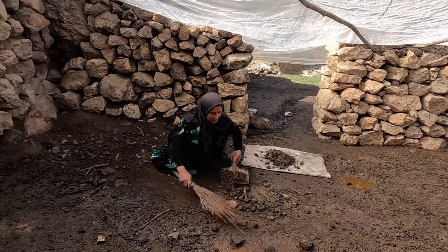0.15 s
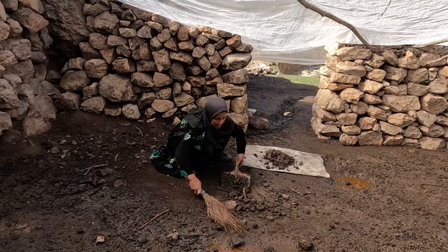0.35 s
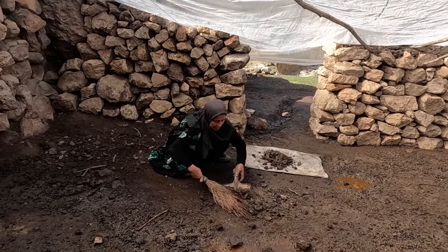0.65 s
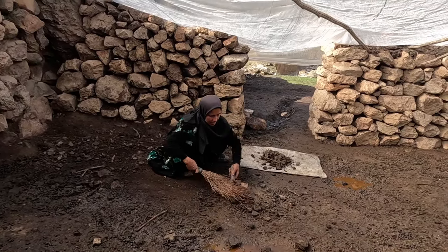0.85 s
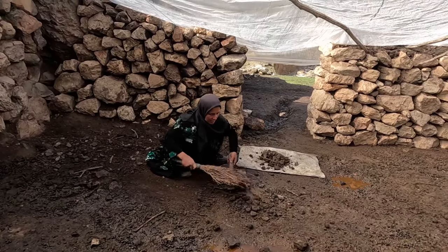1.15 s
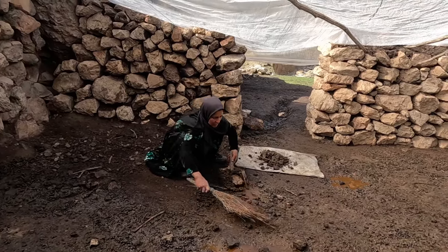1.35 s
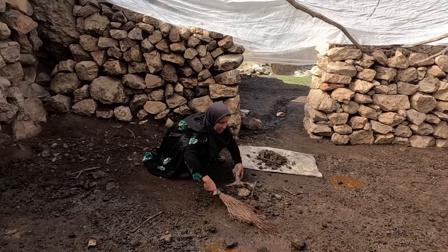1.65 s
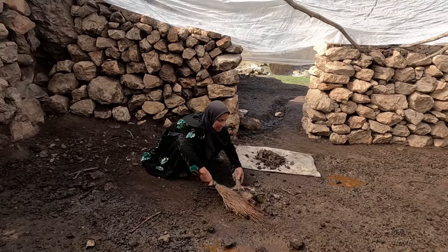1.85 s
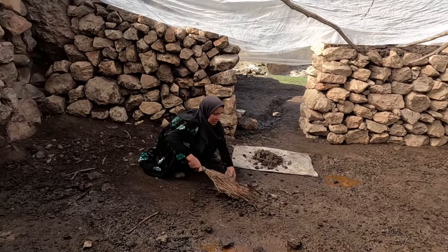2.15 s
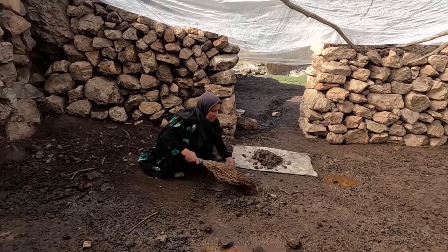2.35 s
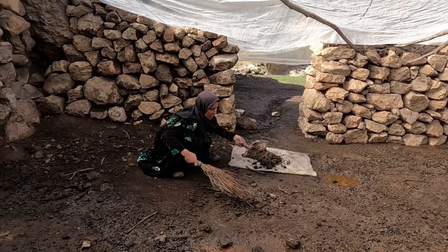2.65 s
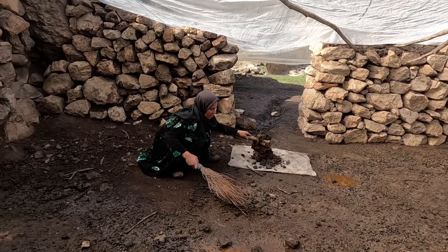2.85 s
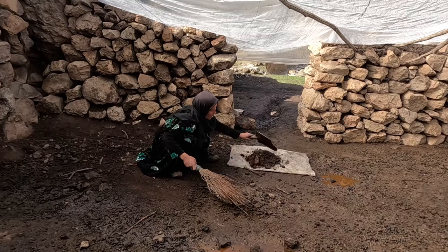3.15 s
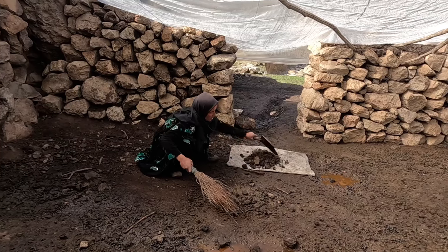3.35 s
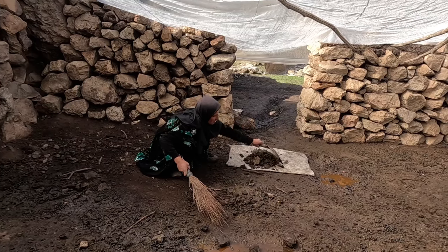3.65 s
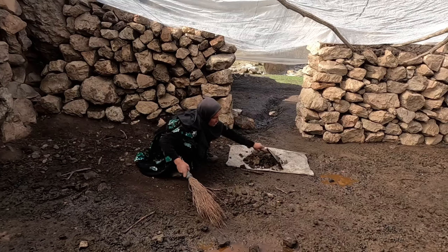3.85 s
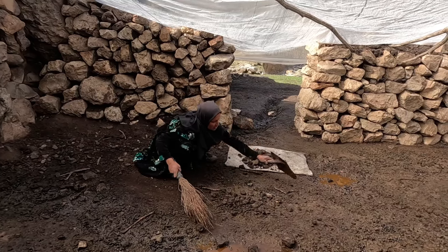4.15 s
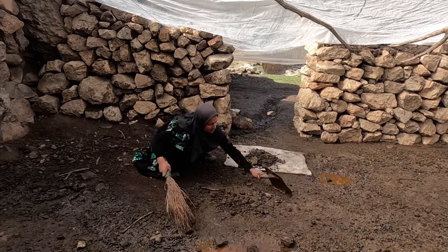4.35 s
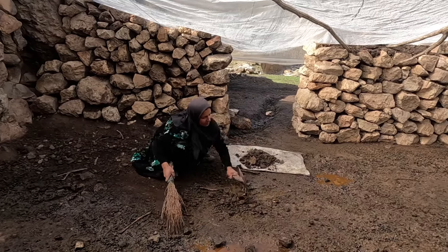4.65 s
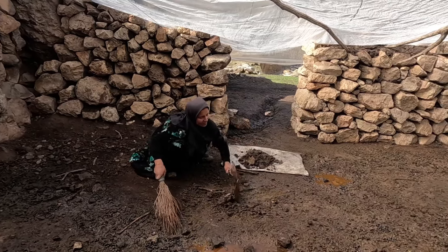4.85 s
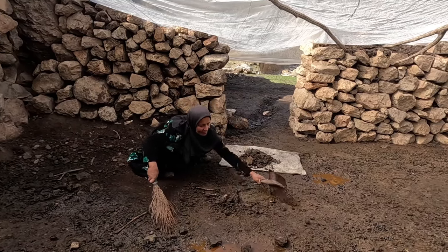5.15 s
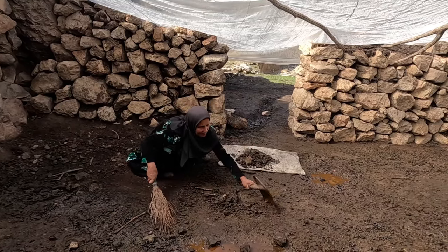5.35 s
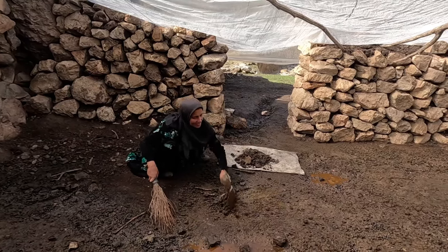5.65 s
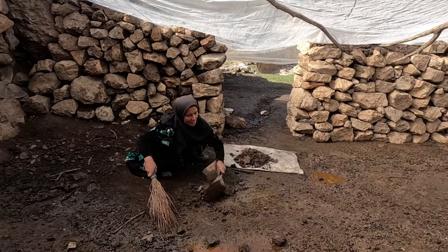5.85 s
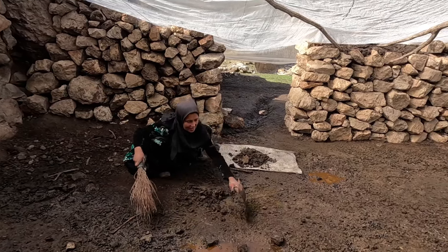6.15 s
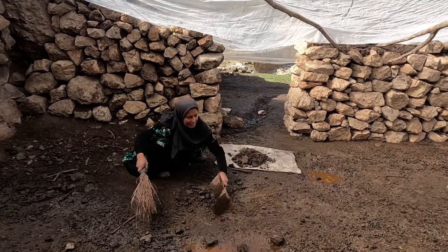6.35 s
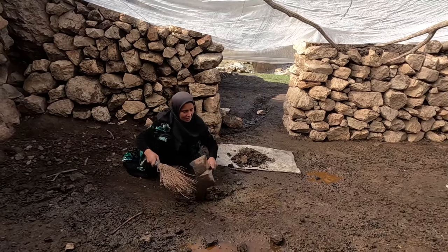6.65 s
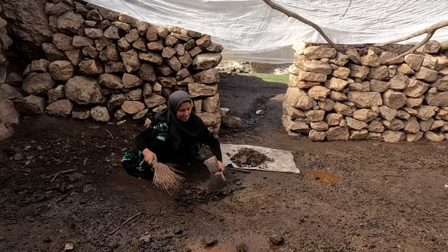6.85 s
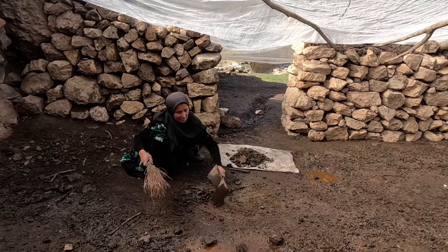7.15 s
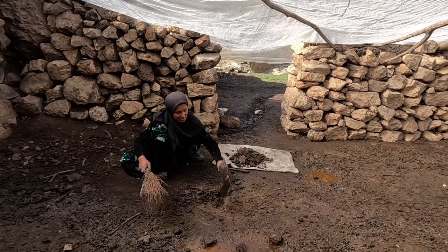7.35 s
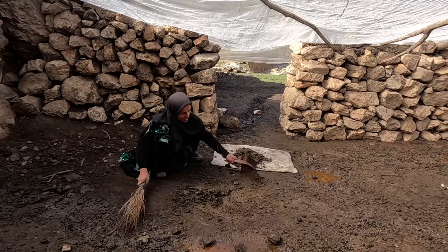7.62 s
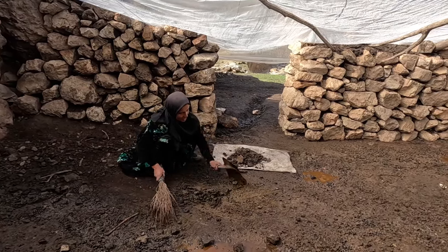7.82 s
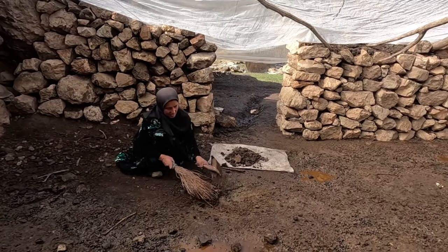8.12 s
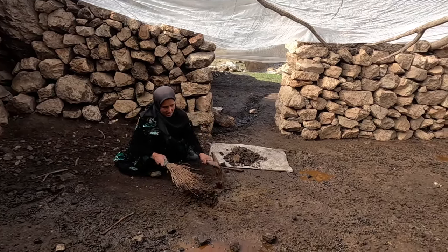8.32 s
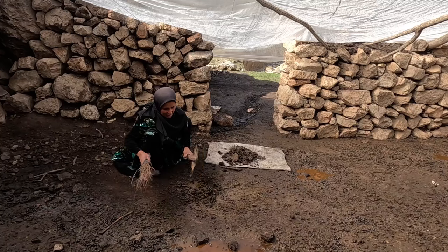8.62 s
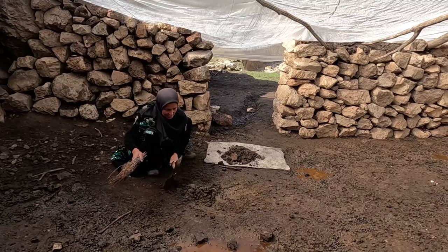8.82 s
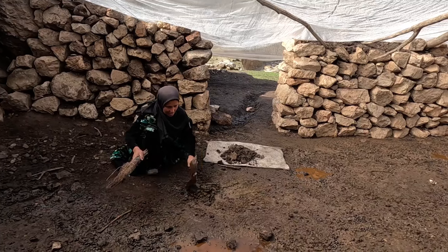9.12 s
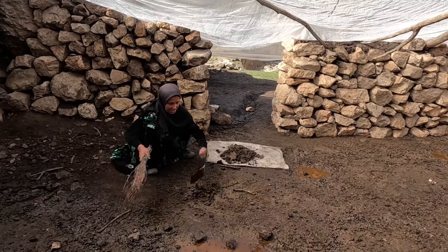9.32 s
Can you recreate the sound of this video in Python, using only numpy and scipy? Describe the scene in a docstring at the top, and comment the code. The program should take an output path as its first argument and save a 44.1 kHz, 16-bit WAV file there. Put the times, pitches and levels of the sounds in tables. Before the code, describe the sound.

A quiet outdoor hush and uneven low wind rumble run throughout. From 0 to 2 s a straw broom gives short, dry, hissing strokes about every half second, with gritty scrapes and a thin scoop knocking brightly, a tight loud cluster at 0.6-0.9 s and more at 1.6-1.7 s. Distant birds trill from 1.2 s, joined by raspy rising chirps at 2-3 s while sweeping pauses. At 3-4 s dirt is tipped and the scoop tapped out: crunchy bursts and dull low thumps, strongest at 3.7 and 3.9 s. Softer thumps, scuffs and swishes follow from 4.4 to 5.7 s. Hard ringing clacks with a strong swish come at 6.4-6.6 s, thumpy scuffs at 7.0 and 7.3 s, faint bird notes around 7.5 s, and a brisk double swish with rattling at 7.9 s. Then only faint scuffs and chirps until a solid scoop knock and scrape at 9.2 s. Stone walls add a very brief scattered tail.

```python
"""A straw broom sweeps earth with a scoop inside a stone pen; noise grains make straw hiss and gritty scrapes.
From the start the yard hushes and wind rumbles (filtered noise), and small birds soon call (gliding tones).
Then come knocks that ring the scoop and scuffs of loose earth: each is a crack and a fading rattle of noise.
From about three seconds on, soft thumps on sack and ground join in, made of fading low tones.
Broom, knocks and scuffs get a short scattered tail from the stone walls."""
import sys
import numpy as np
from scipy import signal
from scipy.fft import rfft, irfft
from scipy.io import wavfile
from scipy.ndimage import uniform_filter1d

SR = 44100
rng = np.random.default_rng(int(sys.argv[2]) if len(sys.argv) > 2 else 0)


def wav_record(signal):
    """Record a signal, one row per channel, as 16-bit PCM in the file named by sys.argv[1]."""
    frames = np.transpose(np.atleast_2d(signal))
    bounded = np.clip(frames, -1, 1)
    # unit amplitude maps onto the largest positive 16-bit level
    quanta = np.round(bounded * 32767).astype(np.int16)
    wavfile.write(sys.argv[1], SR, quanta)


N = 418068

# resonances of the thin scoop, before each user scales them: f/Hz, width/Hz, boost/dB
SCOOP = [(937, 17, 2), (1086, 46, 5), (1282, 200, 6.5), (1532, 110, 10.5), (1906, 120, 7.5), (2297, 280, 4),
         (2600, 180, 5), (3255, 100, 7.5), (4110, 160, 6.5), (4440, 61, 13.5), (5290, 320, 7.5),
         (7320, 3400, 8.5)]


def undb(db):
    """Turn decibels into a gain."""
    return 10 ** (np.asarray(db) / 20)


def unit(x):
    """Scale a sound to an rms (average strength) of 1."""
    return x / np.sqrt(np.mean(x ** 2))


def shape(hz, points):
    """Gain curve through points (f/Hz, level/dB), joined along a log-frequency axis."""
    f, db = np.transpose(points)
    return undb(np.interp(np.log(hz + 1), np.log(f), db))


def scoop_ring(hz, share=np.ones(len(SCOOP))):
    """Resonance peaks of the thin scoop over a flat response; share = how well each one is excited."""
    gain = 1
    for (f, width, boost_db), part in zip(SCOOP, share):
        gain = gain + part * (undb(boost_db) - 1) / (1 + (2 * (hz - f) / width) ** 2)
    return gain


def colour(x, gain):
    """Filter x to the curve gain(Hz) without any sound before its cause (folded cepstrum)."""
    size = 4096
    hz = np.arange(size // 2 + 1) * SR / size
    cepstrum = irfft(np.log(gain(hz) + 1e-9))
    # folding the second half onto the first puts all the response after time zero
    cepstrum[1:size // 2] *= 2
    cepstrum[size // 2 + 1:] = 0
    response = irfft(np.exp(rfft(cepstrum)))
    return signal.fftconvolve(x, response)[:len(x)]


def walk(rate):
    """Slow random wandering: levels held for 1 / rate seconds, then smoothed twice; rms 1."""
    k = int(SR / rate)
    steps = np.repeat(rng.standard_normal(N // k + 1), k)
    smooth = uniform_filter1d(uniform_filter1d(steps, k), k)
    return unit(smooth[:N])


def grains(rate, spread_db, smooth):
    """Random slips of very uneven size, about rate per second, over a smooth rubbing noise."""
    size, sign = rng.exponential(size=N), rng.standard_normal(N)
    hit, rub = rng.random(N), rng.standard_normal(N)
    slips = unit((hit < rate / SR) * sign * undb(spread_db * np.minimum(size, 4.5)))
    return unit(slips + smooth * rub)


def add(out, x, s, pan_db=0.):
    """Mix a short sound into both channels at time s; pan_db = first channel above the second."""
    i = int(s * SR)
    x = x[:N - i]
    out[:, i:i + len(x)] += x * undb([[pan_db / 2], [-pan_db / 2]])


def pressure(column):
    """Gain of all strokes: each presses harder, holds and lets go, and their powers add up."""
    # broom strokes and slides of earth:
    # full pressure at t/s, held/s, straw level/dB, scrape level/dB, fading/(dB per s)
    strokes = [(0, 0.095, -65, -63.5, 91), (.4, 0.12, -50.5, -64, 100), (.55, 0.22, -53, -43, 164),
               (.92, 0.13, -57.5, -53, 102), (1.601, 0.055, -51.5, -43.5, 150), (1.78, 0.1, -51, -44, 154),
               (2.0, 0.12, -57, -59, 27.5), (2.98, 0.1, -62.5, -58, 100), (3.12, 0.29, -51.5, -49.5, 130),
               (3.55, .15, -66.5, -67.5, 92), (3.819, 0.28, -56.5, -59, 82),
               (4.55, 0.27, -52.5, -57, 116.5), (4.95, 0.2, -66.5, -83, 57), (5.48, 0.13, -50.5, -57.5, 86),
               (5.74, 0.12, -54, -56, 98), (6.0, 0.5, -71, -86, 102), (6.42, .18, -47.5, -54.5, 161),
               (7.36, 0.035, -61.5, -84, 148), (7.82, 0.052, -48.5, -58, 106), (7.91, 0.11, -48, -54.5, 81),
               (8.25, 0.08, -64.5, -91, 29), (9.132, .14, -60.5, -58.5, 130)]
    swell_db_per_s = 207.5  # how fast a stroke sets in
    t, power = np.arange(N) / SR, 0
    for row in strokes:
        s, held, fade = row[0], row[1], row[4]
        swelling = swell_db_per_s * (s - t).clip(0)
        fading = fade * (t - s - held).clip(0)
        power = power + undb(row[column] - swelling - fading) ** 2
    return np.sqrt(power)


def broom():
    """Straws slip and snap over earth, and dragged grit excites the scoop's resonances."""
    # colour of the straw hiss: f/Hz, level per Hz/dB
    straw_colour = [(880, -10.5), (1500, -43.5), (1720, -6.5), (1860, -8), (2260, 0.5), (3280, -0.5),
                    (6190, 2.5), (7750, 2), (10700, -20.5), (13700, -26.5), (15500, -69)]
    tips_db = 3  # the straw tips lift the treble
    straw = unit(colour(grains(900, 4.6, 1.41), lambda hz: shape(hz, straw_colour)))
    tips = signal.sosfilt(signal.butter(4, 5600, "high", fs=SR, output="sos"), straw)
    straw = straw + (undb(tips_db) - 1) * tips
    straw = straw * pressure(2) * undb(0.75 * walk(70))

    # colour of the drag: f/Hz, level/dB
    drag = [(150, -23.5), (450, -6.5), (1000, 1.5), (1600, -0.5), (2400, 0.0), (3500, -2), (9000, -43)]
    grit = grains(400, 3.2, 1.0)
    scrape = unit(colour(grit, lambda hz: shape(hz, drag) * scoop_ring(hz) ** 1.3))
    scrape = scrape * pressure(3) * undb(0.5 * walk(71))
    return (straw + scrape) * undb([[.3], [-.3]])


def pen(x):
    """Rough stone walls scatter a short tail, partly different in each channel, most of all in the treble."""
    t60_s, tail_db = 0.13, -1.5  # time to fade by 60 dB, tail level
    t = np.arange(SR // 2) / SR
    common, own = rng.standard_normal(len(t)), rng.standard_normal((2, len(t)))
    own_colour = [(200, 1.5), (2000, 14.5), (7000, 12.5), (12000, 19)]  # f/Hz, level/dB
    own = np.array([colour(v, lambda hz: shape(hz, own_colour)) for v in own])
    tail = (common + .8 * own) * undb(-60 * t / t60_s) * (1 - np.exp(-t / .004))
    tail /= np.sqrt(np.mean(np.sum(tail ** 2, axis=1)))
    return x + undb(tail_db) * signal.fftconvolve(x, tail, axes=1)[:, :N]


def hush():
    """Open-air hush of the valley: wide coloured noise whose level wanders slowly."""
    # colour of the hush: f/Hz, level per Hz/dB
    hush_colour = [(40, -25), (65, -4), (100, -3), (160, 0), (310, -2), (420, -9), (520, -15), (800, -23),
                   (1000, -16), (1300, -14), (2000, -21), (3000, -32), (8000, -32), (10000, -45),
                   (15000, -58)]
    # difference between the channels against what they share: f/Hz, level/dB
    hush_side = [(25, -0.5), (100, -10), (500, -11.5), (2000, -5), (12000, -5)]
    level_db, wander_db = -58.5, 0.69
    whole = colour(rng.standard_normal(N), lambda hz: shape(hz, hush_colour))
    side = colour(rng.standard_normal(N), lambda hz: shape(hz, hush_colour) * shape(hz, hush_side))
    both = np.array([whole + side, whole - side]) / np.std(whole)
    return both * undb(level_db + wander_db * walk(2.41))


def breeze():
    """Wind rumbles at the microphone: deep noise, partly different in each channel, in uneven gusts."""
    # middle level of the rumble, which a random walk then sways: t/s, level/dB
    gust_levels = [(0.0, -64), (0.53, -58.5), (3.54, -59), (3.83, -57), (4.2, -64), (4.51, -49.5),
                   (5.25, -67.5), (5.44, -51), (6.28, -55), (6.76, -63), (7.21, -55.5), (7.601, -61),
                   (7.97, -46.5), (8.34, -70.5), (9.11, -58), (9.48, -63)]
    low = signal.butter(3, [16, 58], "band", fs=SR, output="sos")
    noise = signal.sosfilt(low, rng.standard_normal((2, N)))
    gusts = unit(noise[0] + 0.52 * noise[1] * np.array([[1], [-1]]))
    level_db = np.interp(np.arange(N) / SR, *np.transpose(gust_levels))
    return gusts * undb(level_db + 2.5 * walk(8))


def birds():
    """Distant gliding whistles; raspy notes flutter in pitch, and echoes off stones and slopes smear them."""
    # single notes: t/s, length/s, start f/Hz, end f/Hz, level/dB, rasp (0-1)
    single_notes = [(6.96, .07, 4750, 4450, -74, .3), (7.47, .05, 5600, 5500, -75, .6),
                    (7.47, .05, 3800, 3750, -74, .2), (7.565, .06, 5600, 5400, -75, .6),
                    (7.56, .05, 3950, 3950, -74, .2), (7.605, .09, 4250, 4200, -70, .45),
                    (8.545, .12, 6800, 3600, -67, 1), (8.795, .04, 6500, 4200, -66, 1),
                    (8.81, .11, 4100, 4000, -71, .45), (3.555, .08, 3300, 4500, -58, 1),
                    (4.08, .09, 3200, 4200, -61, 1), (.175, .03, 1900, 2300, -65, .1)]
    # trills: first t/s, number of notes, spacing/s, length/s, start f/Hz, end f/Hz, level/dB, rasp (0-1)
    trills = [(1.2, 8, .133, .03, 1900, 2450, -57, .1), (2.262, 6, .137, .03, 1900, 2450, -57.5, .1),
              (1.955, 10, .1085, .055, 3000, 4700, -57, 1), (1.99, 10, .1085, .055, 3300, 4700, -58, 1)]
    notes = list(single_notes)
    for first, count, gap, *note in trills:
        notes += [(first + k * gap, *note) for k in range(count)]

    out, t = np.zeros((2, N)), np.arange(SR // 4) / SR
    for s, length, start_hz, end_hz, db, rasp in notes:
        u = np.clip(t / length, 0, 1)  # runs from 0 to 1 over the note
        waver = unit(uniform_filter1d(rng.standard_normal(len(t)), SR // 600))
        hz = (start_hz + (end_hz - start_hz) * u) * (1 + .065 * rasp * waver)
        swell = np.sqrt(np.sin(np.pi * u).clip(0))
        tone = swell * np.sin(2 * np.pi * np.cumsum(hz) / SR)
        echo = (.01 + rasp * .05) * rng.standard_normal((2, len(t))) * np.exp(-t / .03)
        echo[:, 0] = 1  # the direct sound
        heard = signal.fftconvolve(tone[None], echo, axes=1)
        heard *= undb(db) / np.sqrt(np.sum(echo ** 2, axis=1, keepdims=True))
        i = int(s * SR)
        out[:, i:i + len(t)] += heard[:, :len(t)]
    return out


def blows(table, ring, crack, lumps_db, crest_db, clod_gain, ring_db, rise_ms):
    """A crack, then loose grit rattling as it dies away; ring = how much the scoop joins in."""
    # centres of the body, ring, edge and grit bands: f/Hz
    band_hz = (420, 1250, 3200, 7000)
    # treble loss of blows: f/Hz, level/dB
    treble_loss = [(200, 3), (7000, 1), (8400, 2.5), (9200, -8.5), (11000, -15.5), (14500, -23.5),
                   (16000, -41)]
    ring_loss_db = 4.5  # per octave: higher blows ring the scoop less
    # stronger blows crack harder: dB of crack per dB above the pivot
    crack_pivot_db, crack_growth = -18.5, 0.43
    rise_s = rise_ms / 1000

    out, t = np.zeros((2, N)), np.arange(SR // 2) / SR
    for s, db, body_db, edge_db, grit_db, t60, pitch in table:
        noise, lumps = rng.standard_normal((2, len(t)))
        share = rng.random(len(SCOOP))  # each blow excites the resonances differently
        rattle = undb(lumps_db * unit(uniform_filter1d(lumps, SR // 400)))
        fade = undb(-60 * t / max(t60, .01))
        push = noise * rattle * (1 - np.exp(-t / rise_s)) ** 2 * fade
        push[0] = crack * undb(crack_growth * (db - crack_pivot_db))

        ring_part = ring_db - ring_loss_db * np.log2(pitch / band_hz[1])
        parts = (body_db, ring_part, edge_db, grit_db)
        # band levels become levels per Hz; below the body the scoop radiates little
        points = [(110, body_db - 36)]
        points += [(f, part - 10 * np.log10(f)) for f, part in zip(band_hz, parts)]

        def blow_colour(hz):
            """Bands and scoop, plus one resonance of the struck clod or straw bundle."""
            clod = 1 + clod_gain / (1 + ((hz - pitch) / (.06 * pitch)) ** 2)
            bands = shape(hz, points) * shape(hz, treble_loss)
            return bands * clod * scoop_ring(hz, ring * (0.38 + share))

        blow = colour(push, blow_colour)
        loudest = np.sqrt(uniform_filter1d(blow ** 2, SR // 150).max())  # strongest short stretch
        add(out, blow * undb(db - crest_db) / loudest, s, .4)
    return out


def knocks():
    """Hard blows ring the scoop."""
    # hard blows; body, edge and grit weigh the colour, pitch is the clod's resonance:
    # t/s, peak level/dB, body/dB, edge/dB, grit/dB, time to fade by 60 dB/s, pitch f/Hz
    hard_blows = [(0.286, -31.5, -23, -15, -21.5, 0.22, 1480),
                  (0.608, -16.5, -28.5, -11.5, -50, 0.096, 2670), (0.645, -27, -26, -18, -43, 0.1, 1580),
                  (0.704, -13.5, -50, -1, -14.5, 0.1, 1480), (0.744, -12.5, -25.5, -7.5, -14, 0.29, 2530),
                  (0.914, -19.5, -34, -17, -26, 0.16, 1510), (1.036, -32.5, -27, -20, -30, 0.23, 1500),
                  (1.155, -35, -32, -29, -33, 0.13, 1310), (1.619, -19.5, -41, -15, -36, 0.12, 2690),
                  (1.719, -28, -20, -8, -20.5, 0.12, 1600), (2.988, -28, -14.5, -17.5, -29, 0.21, 1970),
                  (3.141, -28, -21.5, -9.5, -18, 0.31, 2820), (5.068, -45.5, -30, -25, -28, 0.3, 1290),
                  (5.697, -21.5, -13.5, -1.5, -20.5, 0.25, 1550),
                  (6.554, -11, -27.5, -12, -26.5, 0.18, 1340), (6.607, -19.5, -27, -12, -26, 0.16, 2270),
                  (7.886, -23.5, -15, -5, -9, 0.16, 1600), (7.935, -29.5, -7, -1, -16, 0.15, 4450),
                  (7.987, -26, -5, -2.5, -8.5, 0.21, 2740), (9.202, -12, -10, -7.5, -26.5, 0.2, 956)]
    return blows(hard_blows, ring=0.81, crack=8.7, lumps_db=2.72, crest_db=10.82,
                 clod_gain=0.84, ring_db=-14, rise_ms=0.58)


def scuffs():
    """Loose earth lands and straws scuff, with a weaker crack and less ring."""
    # soft blows; body, edge and grit weigh the colour, pitch is the clod's resonance:
    # t/s, peak level/dB, body/dB, edge/dB, grit/dB, time to fade by 60 dB/s, pitch f/Hz
    soft_blows = [(0.347, -38.5, -30, -10, -5, 0.21, 4120), (0.5, -29, -28, -11, -22, 0.38, 1900),
                  (0.869, -31.5, -27, -3, -7, 0.46, 1490), (1.359, -41.5, -35, -14.5, -20, 0.25, 1470),
                  (1.42, -43, -40, -12, -33, 0.2, 2620), (1.499, -40.5, -32, -5, -5, 0.63, 4400),
                  (1.806, -25, -27, -23.5, -46, 0.13, 1580), (1.897, -27, -35, -11.5, -17, 0.32, 1150),
                  (2.188, -37.5, -21, -10, -17, 0.28, 1480), (2.766, -41, -27, -8, -13, 0.18, 1500),
                  (3.085, -32.5, -21, -4, -13, 0.12, 1170), (3.352, -17.5, -18, -13, -14.5, 0.15, 1170),
                  (3.674, -16.5, -28.5, -15.5, -18.5, 0.26, 2290),
                  (3.93, -11.5, -32, -14.5, -15.5, 0.17, 3800),
                  (4.383, -28.5, -29, -20.5, -20.5, 0.33, 3140), (4.475, -31, -12, -10.5, -11, 0.16, 3120),
                  (4.673, -36, -15, -7.5, -6.5, 0.63, 3020), (5.298, -44, -7, -16, -15, 0.29, 1510),
                  (5.444, -35, -12, -8.5, -9.5, 0.19, 2400), (5.466, -23, -10.5, -30, -30.5, 0.21, 956),
                  (5.756, -28.5, -35, -11, -26, 0.14, 1910), (6.151, -48.5, -22, -11, -9, 0.11, 2830),
                  (6.269, -48.5, -17, -12, -2, 0.47, 1170), (6.436, -37, -20, -23, -10, 0.63, 3870),
                  (7.032, -21, -24, -15, -12.5, 0.2, 2240), (7.297, -34.5, -8, -14.5, -11.5, 0.21, 1220),
                  (7.745, -43, -25, -8, -8, 0.63, 2090), (8.228, -45.5, -26, -1, -3, 0.37, 1280),
                  (8.487, -46.5, -26, -14, -13, 0.15, 1680), (8.699, -56, -7, -26, -3, 0.19, 1260),
                  (8.938, -52, -14, -14, -10, 0.16, 1240), (9.377, -48, -28, -16, -15, 0.36, 1320)]
    return blows(soft_blows, ring=0.59, crack=4.9, lumps_db=1.4, crest_db=10.25,
                 clod_gain=1.13, ring_db=-14.5, rise_ms=1.0)


def thumps():
    """Soft pushes on a hollow body (sack or ground); the pitch sags as it relaxes."""
    # the pushes: t/s, level/dB, settled pitch f/Hz, base time to fade by 60 dB/s
    pushes = [(2.998, -28, 260, 0.05), (3.182, -40, 87, 0.19), (3.357, -40.5, 64.4, 0.12),
              (3.683, -23.5, 78.3, 0.18), (3.94, -20, 84, 0.17), (4.392, -26.5, 89.3, 0.16),
              (4.419, -26.5, 154, 0.067), (5.303, -37, 96, 0.26), (5.472, -30, 280, 0.086),
              (6.271, -45, 118, 0.27), (7.035, -24.5, 95.3, 0.22), (7.303, -26.5, 101.6, 0.2),
              (7.75, -42.5, 81.2, 0.21), (7.901, -40.5, 271, 0.17), (8.95, -49, 62.5, 0.25),
              (9.2, -34.5, 304, 0.11)]
    # tones inside one thump: multiple of the pitch, level/dB, share of the fading time
    hollow_modes = [(0.552, 1.5, .7), (1, 5, 1), (1.22, 0.5, .6), (1.6, -3, .4), (2.899, -4, 0.57)]
    out, t = np.zeros((2, N)), np.arange(SR // 2) / SR
    for s, db, hz, t60 in pushes:
        sagging_hz = hz * (1 + 0.15 * np.exp(-t / 0.033))
        turn = 2 * np.pi * np.cumsum(sagging_hz) / SR
        tone = 0
        for multiple, mode_db, share in hollow_modes:
            fade = undb(mode_db - 60 * t / max(share * t60, .01))
            tone = tone + fade * np.sin(multiple * turn)
        soft_start = 1 - np.exp(-t / 0.0085)
        add(out, undb(db) * tone * soft_start, s - .003)
    return out


def scene():
    """Work with broom and scoop inside the walls, plus thumps and the sounds from outside."""
    inside = pen(broom() + knocks() + scuffs())
    outside = hush() + breeze() + birds()
    return inside + outside + thumps()


def record(dry):
    """The microphone chain cuts the top steeply."""
    top_hz = 15500
    return signal.sosfilt(signal.ellip(10, .2, 70, top_hz, fs=SR, output="sos"), dry)


dry = scene()
out = record(dry)
wav_record(out)
```